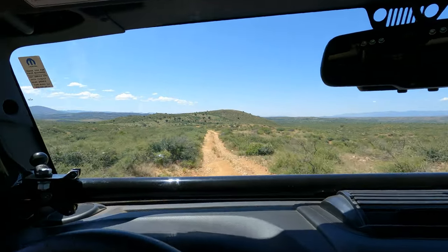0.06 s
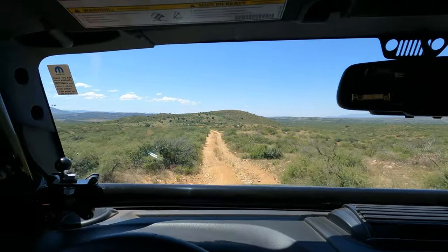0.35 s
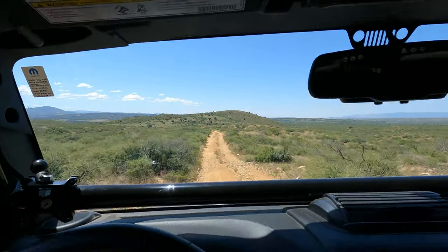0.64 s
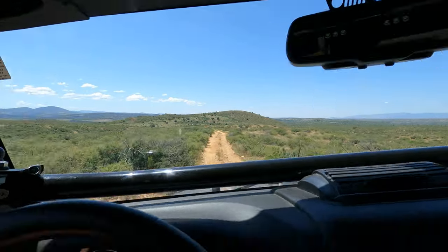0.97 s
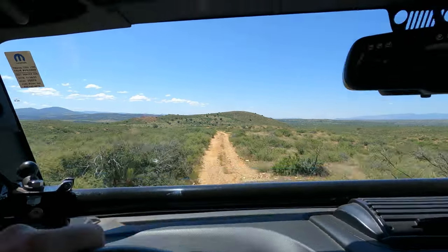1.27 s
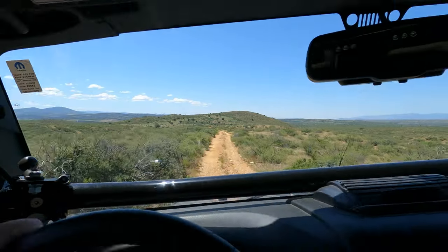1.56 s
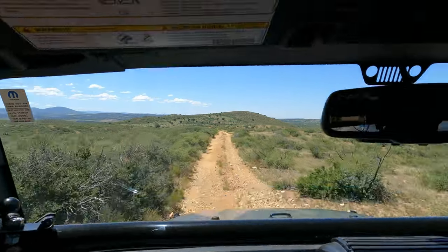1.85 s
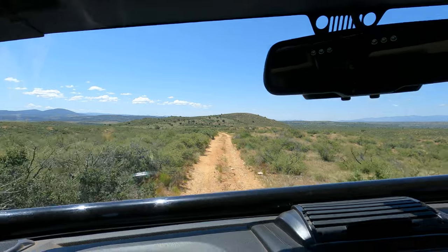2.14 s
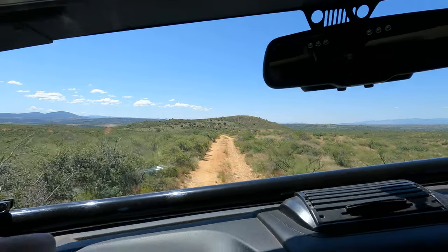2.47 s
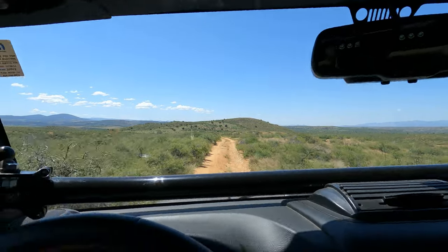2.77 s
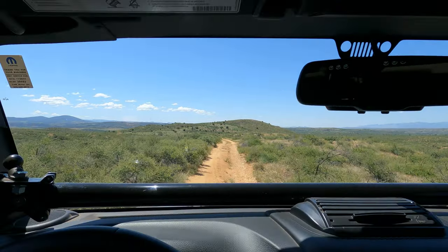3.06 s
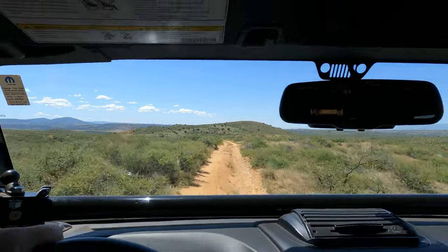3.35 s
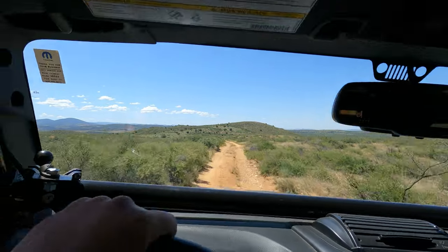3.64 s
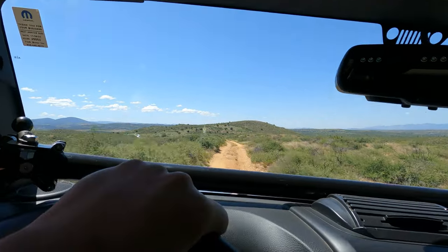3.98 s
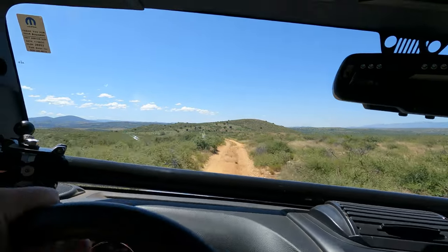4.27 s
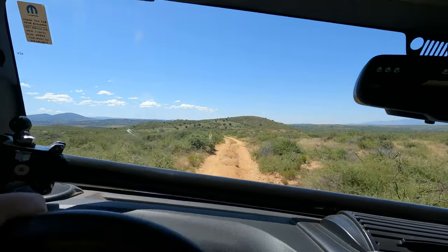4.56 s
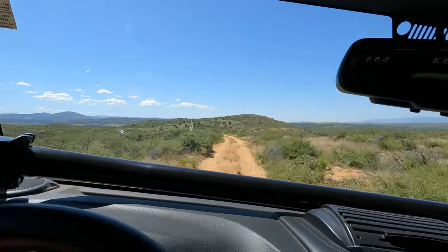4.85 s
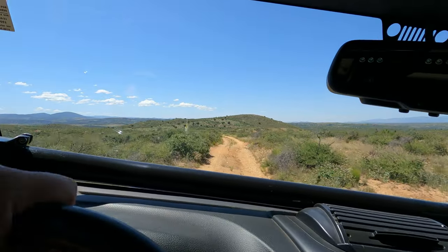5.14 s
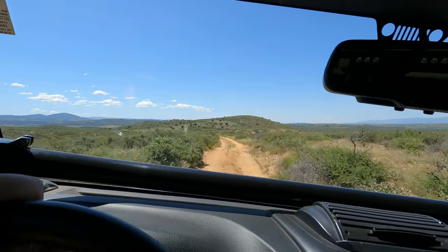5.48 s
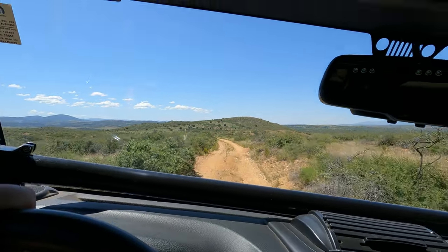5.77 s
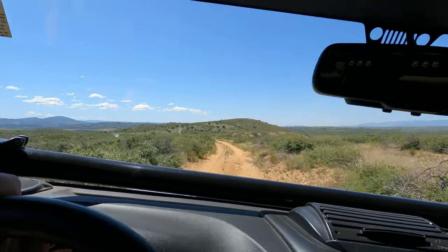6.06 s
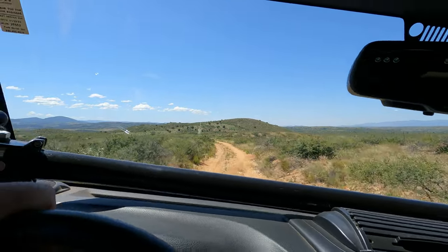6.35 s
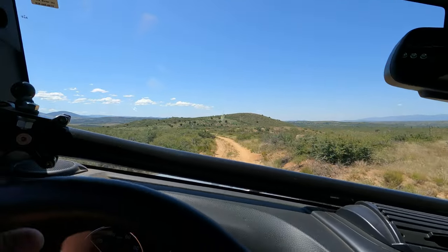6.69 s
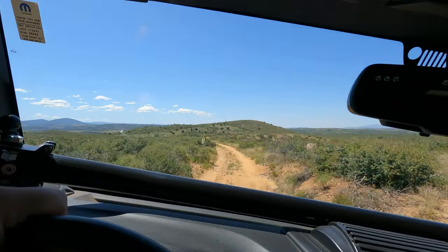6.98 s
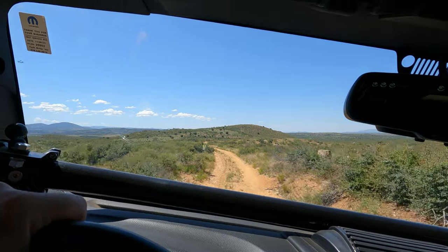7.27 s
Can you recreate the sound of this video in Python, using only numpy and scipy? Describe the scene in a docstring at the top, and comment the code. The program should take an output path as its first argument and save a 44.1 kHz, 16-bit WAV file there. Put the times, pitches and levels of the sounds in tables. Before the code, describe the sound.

Inside a four-wheel-drive vehicle on a rough dirt track: deep rumble, low engine, thumps over ruts, rattling gear and thin squeaks.

```python
"""A deep boom and the roar of tyres fill a four-wheel-drive vehicle on a rough dirt track, over a low
engine. The rough ground forces the body and the cabin air into vibration, and ruts thump through the
suspension. Impacts excite damped modes: the dashboard clunks, loose gear clatters and jangles. Stones
tick underneath, and stick-slip friction draws thin, high squeaks from the trim. After four seconds
the track is smoother and a soft hiss of air shows."""
import sys
import numpy as np
from scipy import signal
from scipy.fft import rfft, irfft
from scipy.io import wavfile
from scipy.ndimage import uniform_filter1d

SR = 44100
rng = np.random.default_rng(int(sys.argv[2]) if len(sys.argv) > 2 else 0)


def transcribe(signal):
    """Save signal, clipped to [-1, 1], as a 16-bit WAV file at the path in sys.argv[1]."""
    frames = np.atleast_2d(signal).T
    limited = np.clip(frames, -1, 1)
    pcm = np.round(limited * 32767).astype(np.int16)
    wavfile.write(sys.argv[1], SR, pcm)


N = 327222
T = np.arange(N) / SR

# Spectra of the noise sources: (frequency [Hz], relative spectral density [dB])
HISS_SPECTRUM = [(300, -4), (1500, 0), (3000, -1), (4500, -2.5), (7000, -3.5), (8500, -7), (11000, -10.5),
                 (15500, -14.5)]
DRUM_SPECTRUM = [(15, 0.5), (30, 5), (46, -2), (58, 3.5), (72, -6), (100, -16), (200, -55)]
CHATTER_SPECTRUM = [(1200, -18), (2400, 7.5), (3300, -3.5), (4400, -3), (5500, -3.5), (7500, -6.5),
                    (9300, -9.5), (11000, -11), (15500, -14)]
CLATTER_SPECTRUM = [(250, 19.5), (700, 17), (1200, 9), (2300, 7.5), (3200, 5.5), (5000, -0.5), (6500, -3),
                    (9300, -5), (11500, -11), (15500, -14)]
THUD_SPECTRUM = [(40, 11.5), (75, -6), (120, 9), (190, 2), (260, 0), (370, -7), (580, -8.5), (900, -18.5),
                 (2500, -27)]
CRUNCH_SPECTRUM = [(250, -2), (500, 4.5), (750, -0.5), (1100, -1), (1700, -5.5), (2400, -12), (3300, -16),
                   (6000, -28.5), (15000, -72)]
ROAR_SPECTRUM = [(50, -9), (80, 1.5), (120, 3), (150, -3), (180, 2), (215, -5), (260, -4), (400, -9.5),
                 (550, -15.5), (900, -19), (2500, -63)]
BOOM_SPECTRUM = [(6, -54), (14, 0), (22, 5), (35, -8), (50, -22.5), (65, -26), (85, -18), (130, -34.5),
                 (300, -98)]
# Envelopes of the hiss, air drumming, shaking, ground roughness and body boom: (time [s], level [dB])
HISS_LEVEL = [(0, -73), (3.1, -72), (4.6, -70), (5.6, -74), (6.25, -75), (6.6, -70.5), (7, -70.5),
              (7.42, -74)]
DRUM_LEVEL = [(.4, -6), (1, 1.5), (6.3, 0.5), (6.6, -2)]
SHAKE_LEVEL = [(0, -62.5), (.3, -68), (.78, -63.5), (1.02, -57.5), (1.3, -62), (1.55, -55.5), (1.8, -59),
               (2.1, -57.5), (2.3, -65), (2.55, -59.5), (2.8, -61.5), (3.25, -63), (3.5, -66), (3.7, -64),
               (4.1, -72.5), (6.2, -71), (7.42, -77)]
TRACK_ROUGHNESS = [(0.0, -53.5), (0.29, -56.5), (0.56, -55.5), (0.99, -47), (1.38, -50), (1.55, -48.5),
                   (2.19, -51.5), (3.2, -51.5), (3.29, -54), (3.8, -52), (4.13, -59), (4.28, -58.5),
                   (5.87, -59.5), (6.18, -56.5), (6.34, -60.5), (6.53, -64), (6.98, -63), (7.42, -62.5)]
BOOM_LEVEL = [(0, -24.5), (.35, -33), (.55, -24), (.75, -31.5), (1.05, -23), (1.3, -31.5), (2.05, -24),
              (2.35, -29.5), (2.7, -24), (2.98, -31), (3.25, -25), (3.7, -30), (4.1, -32.5), (5.25, -37.5),
              (5.55, -31.5), (6.2, -29.5), (6.6, -32.5), (7.42, -40.5)]
# Modes of metal gear, dashboard and body on its mounts: (frequency [Hz], level [dB], t60 [s])
GEAR_MODES = [(1910, 15, 0.082), (2130, -19, 0.14), (2494, 20, 0.04), (4030, 9, .05), (5200, -1, 0.042),
              (6620, 16, 0.02), (6260, -3, 0.028), (6200, 4, .04), (8100, 9, 0.066)]
DASHBOARD_MODES = [(253.4, -11, 0.17), (371, -3, 0.12), (437, -10.5, 0.075), (623, 2.5, 0.042),
                   (752, -8.5, 0.13), (997, 6, .05), (1240, -3, .06)]
BODY_MODES = [(21.6, 0, 0.37), (50, -7.5, 0.3)]
# Running state of the engine: (time [s], crankshaft speed [rev/s], load [dB])
ENGINE_STATE = [(0, 28, -5), (1.5, 27, 1), (3.4, 19, -1), (3.9, 22, 6), (4.15, 22, 11.5), (4.35, 22, 14),
                (4.52, 22.2, -5), (4.66, 21.9, 15.5), (4.87, 21.4, -6), (5.1, 20.6, 9.5), (5.28, 19.3, -2),
                (5.42, 22, 5.5), (5.7, 21, 6.5), (6.45, 18.8, 7), (6.62, 17.3, -11), (6.85, 19, -2),
                (7.42, 18.3, -1)]
# Harmonics of the crankshaft rotation: (order [cycles/rev], level [dB])
ENGINE_ORDERS = [(2, -39), (3, -53.5), (6, -63), (8, -70), (12, -77)]
# Rubs of the trim: (time [s], duration [s], pitch [Hz], level [dB], glide [share], overtones [dB])
RUBS = [(0.33, 0.12, 4660, -70, -0.014, -8), (.492, 0.047, 4620, -66, 0.0029, -5),
        (0.638, 0.053, 4180, -56.5, 0.015, -13), (0.876, .04, 7720, -59, -0.0051, -20),
        (1.185, .035, 7800, -61, 0, -20), (1.642, 0.057, 7730, -55.5, -.01, -20),
        (1.685, 0.065, 4090, -59, -0.02, -11), (1.892, .046, 4570, -51, 0, -10),
        (1.933, .013, 6500, -46, -.6, -25), (1.944, .024, 4280, -47, -.03, -20),
        (1.908, .035, 6900, -57, 0, -20), (2.022, 0.038, 4200, -57, .01, -7),
        (2.504, .07, 2383, -53, 0.047, -12), (2.698, 0.04, 4330, -58, 0, -15),
        (2.745, 0.02, 2820, -49, -.05, -24), (2.88, 0.04, 2330, -53, -.02, -23),
        (2.86, 0.036, 4590, -66.5, 0.014, 3), (3.094, 0.057, 6290, -56, 0, -5),
        (3.192, .04, 6250, -62.5, 0, -15), (4.159, .025, 2610, -63, -.02, -21),
        (4.635, 0.068, 4580, -65.5, 0.015, -5), (4.73, 0.051, 4490, -65, -.015, -6),
        (5.054, 0.03, 2590, -64, -.06, -22), (6.324, 0.122, 4620, -60.5, -0.006, -13),
        (6.587, 0.043, 4190, -71, -.015, -3), (6.868, 0.073, 4670, -66.5, .01, -4),
        (6.93, .11, 4610, -70, -0.0063, -5)]
# Natural notes of the small metal parts: (frequency [Hz])
PART_NOTES = [3900, 4230, 5080, 6020, 6230, 6720, 7200, 7500, 8250, 9050]
# Short, buzzing pings of small metal parts: (time [s], pitch [Hz], level [dB])
PART_STRIKES = [(.615, 12880, -51), (.615, 9250, -56), (.62, 7400, -57), (1.408, 9200, -59),
                (1.008, 13980, -51), (1.04, 12950, -64), (1.24, 8270, -64), (1.408, 12930, -55),
                (1.572, 7100, -53), (1.85, 6180, -37), (1.617, 13980, -54), (1.98, 12120, -53),
                (1.992, 8230, -48), (2.005, 10290, -53), (2.118, 12900, -53), (2.166, 8860, -51),
                (2.52, 9600, -56), (2.705, 7700, -51), (2.87, 12900, -58), (2.695, 15100, -62),
                (2.872, 9250, -58), (2.877, 7460, -58), (2.922, 8600, -60), (2.963, 12940, -60),
                (3.035, 12500, -70)]
# Knocks of loose gear: (time [s], level [dB], duration [s], peak [Hz], metal ring [dB], peak gain [dB])
GEAR_KNOCKS = [(0.44, -51, 0.0061, 1200, -22, 9), (0.451, -55.5, .014, 8500, -26, 15),
               (0.495, -47.5, .009, 4830, -18, -2), (0.712, -55, 0.04, 12000, -22, 6),
               (.783, -47.5, .002, 7360, -21, 8), (0.898, -46, 0.01, 9500, -18, 4),
               (0.932, -47, 0.033, 3040, -24, 3), (1.03, -49, 0.016, 11000, -19, 13),
               (1.087, -50, 0.039, 7500, -19, 9), (1.254, -50.5, 0.011, 6900, -19, 8),
               (1.373, -45, 0.0039, 900, -18, 14), (1.408, -49.5, .02, 9000, -19, 5),
               (1.455, -49.5, 0.016, 8000, -8, 7), (1.481, -36.5, 0.029, 970, -29, 10),
               (1.525, -37.5, .016, 7000, -27, 7.5), (1.536, -41, 0.029, 1500, -24, 14),
               (1.583, -49, 0.017, 8000, -19, 15), (1.683, -45, .002, 900, -18, 22),
               (1.718, -36, 0.0023, 1820, -10, 17), (1.826, -44.5, .015, 8000, -11, 9),
               (1.851, -34, 0.018, 6300, -11, 11.5), (1.865, -37, 0.017, 1910, -14, 11),
               (1.915, -44, 0.012, 1300, -22, 20), (1.938, -45, 0.011, 3500, -25, 11),
               (2.019, -46, 0.025, 885, -7, 6), (2.084, -47.5, 0.02, 9000, -30, 9),
               (2.161, -57, 0.0062, 12000, -16, 10), (2.185, -49.5, 0.0017, 9100, -32, 25),
               (2.209, -48, 0.011, 990, -18, 16), (2.37, -52.5, 0.035, 8100, -20, 9),
               (2.416, -47.5, 0.0054, 4300, -28, 10), (2.526, -50.5, 0.055, 2430, -20, 2),
               (2.551, -44, 0.0057, 2000, -12, 8), (2.598, -51, .006, 2500, -2, 10),
               (2.747, -41.5, 0.0045, 2870, -14, 10), (2.864, -52, 0.032, 7500, -27, 4),
               (3.021, -55, 0.0081, 4000, -19, 8), (3.308, -49.5, 0.015, 1700, -16, 21),
               (3.333, -48.5, 0.021, 5340, -18, 6), (3.472, -45, .006, 636, -20, 11),
               (3.568, -56, .012, 2500, -10, 18), (3.616, -47.5, 0.028, 1170, -22, 16),
               (3.704, -57, 0.0087, 7000, -18, 15), (3.819, -48.5, 0.0066, 2000, -20, 1),
               (3.877, -49, 0.034, 865, -9, 15), (3.944, -62, 0.011, 8000, -16, 12),
               (4.011, -56, .008, 3000, -20, 13), (4.382, -55, 0.0044, 3000, -20, 4),
               (4.432, -57, 0.017, 12000, -26, 10), (4.786, -55.5, 0.012, 6000, -12, -2),
               (5.272, -57.5, .022, 6000, -21, 3), (5.734, -57.5, .01, 8000, -7, 7),
               (6.183, -50, .005, 1802, -22, 9), (6.224, -54, 0.0079, 4000, -27, 6),
               (6.457, -56.5, .007, 4500, -9, 12), (6.747, -50, 0.0017, 2200, -21, 2),
               (7.308, -57, 0.0021, 9000, -18, 7.5)]
# Blows on the hollow dashboard: (time [s], level [dB], centre frequency [Hz])
DASHBOARD_BLOWS = [(.858, -34, 603), (.943, -27, 372), (.972, -31, 350), (1.371, -32, 574),
                   (1.719, -30.5, 650), (1.766, -29.5, 278), (1.868, -31, 470), (1.915, -35, 400),
                   (2.02, -37, 520), (2.1, -34.5, 496), (2.553, -33.5, 660), (2.577, -43, 630),
                   (3.199, -48, 490), (3.32, -41, 556), (3.533, -42, 750)]
# Wheels hitting ruts: (time [s], thud level [dB], decay time [s], panel note [Hz], body swing [dB])
RUTS = [(.554, -34, 0.091, 118, -24), (.62, -44, 0.073, 225, -25), (0.849, -28.5, 0.049, 265, -28),
        (.943, -27, 0.015, 368, -41), (0.974, -23.5, 0.02, 392, -14.5), (1.033, -26, 0.012, 136, -25),
        (1.371, -30.5, 0.043, 194, -13), (1.426, -33.5, 0.024, 258, -43), (1.493, -24, 0.035, 197, -8),
        (1.534, -29, 0.028, 320, -13), (1.865, -36.5, 0.23, 268.6, -50), (2.031, -35, 0.089, 240, -16.5),
        (2.123, -30, 0.016, 174, -42), (2.384, -27, 0.02, 237, -51), (2.56, -36, 0.041, 314, -14),
        (2.68, -30.5, 0.057, 220, -24), (2.879, -37, 0.046, 116, -28), (3.034, -36, 0.074, 192, -57),
        (3.185, -27.5, 0.072, 202, -16), (3.301, -26.5, 0.043, 185, -18), (3.815, -36, 0.038, 138, -22.5),
        (5.969, -32.5, 0.029, 285, -42), (6.17, -43, 0.048, 109, -53), (6.218, -44.5, 0.21, 294, -53),
        (6.421, -40, 0.12, 162.4, -53), (6.93, -44, 0.15, 250, -47), (7.33, -49.5, 0.076, 170, -34)]


def amp(db):
    """Amplitude ratio of a level in decibels."""
    return 10 ** (np.asarray(db) / 20)


def unit(x):
    """Normalisation to rms 1."""
    return x / np.sqrt(np.mean(x ** 2) + 1e-20)


def envelope(table):
    """Linear interpolation of a (time, level) table at every sample."""
    return np.interp(T, *np.transpose(table))


def add(mix, start_s, sound):
    """Superposition of a sound on the mix, in place."""
    part = mix[max(round(start_s * SR), 0):][:len(sound)]
    part += sound[:len(part)]


def colour(x, spectrum, peak_hz=1000, peak_db=0, octaves=1):
    """Filtering by a spectrum plus one resonance, whose half-width is in octaves; rms 1."""
    octave = np.log2(np.fft.rfftfreq(len(x), 1 / SR) + 1)
    hz, db = np.transpose(spectrum)
    rolloff_db = 20 * np.maximum(octave - np.log2(hz[-1]), 0)
    resonance_db = peak_db / (1 + ((octave - np.log2(peak_hz)) / octaves) ** 2)
    gain = amp(np.interp(octave, np.log2(hz), db) + resonance_db - rolloff_db)
    return unit(irfft(rfft(x) * gain, len(x)))


def wander(rate_hz, size=N):
    """Random fluctuation: noise low-passed at about the given rate; rms 1."""
    hz = np.fft.rfftfreq(size, 1 / SR)
    return unit(irfft(rfft(rng.standard_normal(size)) * np.exp(-(hz / rate_hz) ** 2), size))


def steadied(x, span_s):
    """Division by the running rms evens out swells longer than the span."""
    return x / np.sqrt(np.abs(uniform_filter1d(x ** 2, int(span_s * SR))) + 1e-9)


def impacts(per_s, spread_db, size=N):
    """A Poisson train of impulses; a positive spread makes a few stronger, a negative one weaker."""
    height = amp(spread_db * np.minimum(rng.exponential(1, size), 4)) * rng.choice([-1, 1], size)
    return height * (rng.random(size) < per_s / SR)


def grit(per_s, spread_db, decay_s):
    """Incoherent impacts add in power, each an exponentially decaying puff of noise."""
    power = signal.lfilter([1], [1, -np.exp(-2 / (decay_s * SR))], impacts(per_s, spread_db) ** 2)
    return np.sqrt(power) * rng.standard_normal(N)


def ring(modes, t):
    """Free decay of damped modes."""
    return sum(amp(db - 60 * t / t60) * np.sin(2 * np.pi * hz * t) for hz, db, t60 in modes)


def cabin(x, wet_db, t60):
    """Reverberation: dense, short reflections off the glass and the hard roof."""
    t = T[:SR // 4]
    tail = rng.standard_normal(len(t)) * amp(-60 * t / t60) * (t > .002)
    wet = signal.oaconvolve(x, tail / np.linalg.norm(tail))[:N]
    return (x + amp(wet_db) * wet) / np.hypot(1, amp(wet_db))


def roughness():
    """Excitation by the track, in dB about its mean; a source's slope is its dB per dB of this."""
    db = envelope(TRACK_ROUGHNESS)
    return db - db.mean()


def air_hiss():
    """Broadband noise of air hisses softly in the cabin."""
    return amp(envelope(HISS_LEVEL)) * colour(rng.standard_normal(N), HISS_SPECTRUM)


def engine(level_db=-2, wobble=0.0082, throb_db=3.5):
    """Periodic forcing gives low harmonics of the crankshaft speed, which swell with the load."""
    times, speed, load_db = np.transpose(ENGINE_STATE)
    turns = np.cumsum(np.interp(T, times, speed) * (1 + wobble * wander(4.3))) / SR
    drone = sum(amp(db + throb_db * wander(7.8)) * np.sin(2 * np.pi * order * turns)
                for order, db in ENGINE_ORDERS)
    return amp(level_db + np.interp(T, times, load_db)) * drone


def cabin_drumming(level_db=-39.0, slope=0.05):
    """Cavity resonance: the enclosed air drums, a little harder on rough ground."""
    drumming = steadied(colour(rng.standard_normal(N), DRUM_SPECTRUM), span_s=0.52)
    return amp(level_db + envelope(DRUM_LEVEL) + slope * roughness()) * drumming


def stone_ticks(level_db=-73, slope=0.77):
    """Brief impacts have broad spectra: stones flick off the tread and tick on the underside."""
    hits = grit(per_s=30, spread_db=2.5, decay_s=0.003)
    ticks = colour(hits, CLATTER_SPECTRUM, peak_hz=9000, peak_db=5)
    return cabin(amp(level_db + slope * roughness()) * ticks, wet_db=-12.0, t60=0.036)


def trim_squeaks(gain_db=0.5, dull_hz=9500, dull_db_per_octave=-24):
    """Stick-slip friction: a thin tone whose pitch and level arch with the speed of the rub."""
    arch, waver, catch_db = .022, .003, 2.3
    rasp_radians, rasp_hz, firm_db, radians_per_light_db = .38, 4600, -62, .08
    out = np.zeros(N)
    for start, length, hz, db, glide, overtone_db in RUBS:
        along = np.linspace(-.5, .5, int(length * SR))
        speed = np.cos(np.pi * along).clip(0)
        jitter, grip, slips = (wander(rate_hz, SR // 2)[:len(speed)] for rate_hz in (60, 70, 240))
        pitch = hz * (1 + arch * (speed - speed.mean()) + glide * along + waver * jitter)
        # Low creaks and light rubs rasp most.
        rasp = rasp_radians * max(rasp_hz / hz, 1) ** 2 + radians_per_light_db * max(firm_db - db, 0)
        phase = 2 * np.pi * np.cumsum(pitch) / SR + rasp * slips
        tone = np.sin(phase)
        for k in (2, 3):
            if k * pitch.max() < SR / 2:
                dulling_db = dull_db_per_octave * max(np.log2(k * hz / dull_hz), 0)
                tone += amp(overtone_db + dulling_db) * np.sin(k * phase)
        add(out, start, amp(db + gain_db + catch_db * (grip - grip.mean())) * np.sqrt(speed) * tone)
    return cabin(out, wet_db=-5.5, t60=0.077)


def touching_parts(pitches, per_s, spread_db, t60):
    """Impulse response: each small metal part rings at its own pitch whenever it is touched."""
    notes = (ring([(hz, 0, t60)], T[:SR // 8]) for hz in pitches)
    return sum(signal.oaconvolve(impacts(per_s, spread_db), note)[:N] for note in notes)


def jolts(settle_s):
    """Exponential relaxation of the shaking that each rut starts; 1 at its strongest."""
    kicks = np.zeros(N)
    for start, db, *_ in RUTS:
        add(kicks, start, amp([db]))
    shaking = signal.lfilter([1], [1, -np.exp(-1 / (settle_s * SR))], kicks)
    return shaking / shaking.max()


def rattle(ticks_db=-3, chinks_db=-9, jangle_db=-10, slack_db=-70, jolt_db=5, fitful_db=1.5):
    """Contact across a clearance: loose parts tick, chink and jangle as shaking takes up their slack."""
    shake = amp(envelope(SHAKE_LEVEL) + jolt_db * jolts(settle_s=0.074) + fitful_db * wander(27))
    contact = shake ** 2 / np.hypot(shake, amp(slack_db))
    ticks = colour(grit(per_s=140, spread_db=-4.0, decay_s=0.012), CHATTER_SPECTRUM)
    chink_hz = np.geomspace(3500, 13500, 36) * rng.uniform(1.0, 1.03, 36)
    chinks = colour(touching_parts(chink_hz, per_s=6, spread_db=2.0, t60=0.04), CHATTER_SPECTRUM)
    jangle_hz = np.outer(PART_NOTES, [.985, 1, 1.015]).ravel()  # a note varies with how the part lies
    jangle = unit(touching_parts(jangle_hz, per_s=14, spread_db=3.0, t60=0.066))
    return contact * (amp(ticks_db) * ticks + amp(chinks_db) * chinks + amp(jangle_db) * jangle)


def metal_pings(rise_s=0.004, t60=0.1, beat_hz=70, twin_db=-6, chatter_db=3, buzz_radians=.8):
    """Two close modes beat in each struck part, modulated as it buzzes against its seat."""
    out, t = np.zeros(N), T[:SR // 4]
    for start, hz, db in PART_STRIKES:
        phase = 2 * np.pi * hz * t + buzz_radians * wander(400, len(t))
        pair = np.sin(phase) + amp(twin_db) * np.sin(phase + 2 * np.pi * beat_hz * t)
        ping = pair * amp(-60 * t / t60) * (1 - np.exp(-t / rise_s))
        chatter = unit(amp(chatter_db * wander(450, len(t))))
        add(out, start, amp(db) * chatter * ping)
    return cabin(out, wet_db=-9, t60=0.068)


def gear_knocks(rise_s=0.0007, rise_share=0.12, fall_s=0.0037, fall_share=0.13):
    """Bursts of quick contacts excite the gear's metal modes; longer bursts build and die more slowly."""
    out, t = np.zeros(N), T[:SR // 4]
    metal = ring(GEAR_MODES, t)
    for start, db, length, hz, ring_db, peak_db in GEAR_KNOCKS:
        hits = impacts(per_s=5000, spread_db=1.7, size=len(t))
        contacts = steadied(colour(hits, CLATTER_SPECTRUM, hz, peak_db, octaves=0.68), span_s=0.0035)
        rise = 1 - np.exp(-t / (rise_s + rise_share * length))
        fall = np.exp(-np.maximum(t - length, 0) / (fall_s + fall_share * length))
        burst = contacts * rise * fall
        ringing = unit(signal.fftconvolve(burst, metal)[:len(t)]) * np.std(burst)
        add(out, start, amp(db) * (burst + amp(ring_db) * ringing))
    return cabin(out, wet_db=-8.0, t60=0.21)


def dashboard_clunks(rise_s=0.0037, falloff_db_per_octave=16, detune=0.017, judder_db=2):
    """Modal excitation: each blow favours the panel modes near its own centre frequency."""
    out, t = np.zeros(N), T[:SR // 4]
    for start, db, centre_hz in DASHBOARD_BLOWS:
        modes = [(hz * (1 + detune * rng.standard_normal()),
                  mode_db - falloff_db_per_octave * abs(np.log2(hz / centre_hz)), t60)
                 for hz, mode_db, t60 in DASHBOARD_MODES]
        judder = amp(judder_db * wander(120, len(t)))
        clunk = ring(modes, t) * (1 - np.exp(-t / rise_s)) * judder
        add(out, start, amp(db) * clunk / abs(clunk).max())
    return cabin(out, wet_db=-5.5, t60=0.15)


def rut_thumps(rise_s=0.0037, hollow_db=11, note_db=-13):
    """Transient response: each rut thuds through a resonant panel and sets the body swinging."""
    out, t = np.zeros(N), T[:SR // 2]
    for start, db, decay_s, hz, swing_db in RUTS:
        panel = colour(rng.standard_normal(len(t)), THUD_SPECTRUM, hz, hollow_db, octaves=0.51)
        note = amp(note_db) * np.sin(2 * np.pi * hz * t)
        thud = amp(db) * (steadied(panel, span_s=0.0182) + note) * np.exp(-t / decay_s)
        swing = amp(swing_db) * ring(BODY_MODES, t)
        add(out, start, (thud + swing) * (1 - np.exp(-t / rise_s)))
    return out


def rolling(roar_db=-45.5, crunch_db=-55.5, roar_slope=0.82, lumps_db=1.23, uneven_db=1.12):
    """Random forcing by the ground: the sprung body booms, the wheel arches roar, the tread crunches."""
    rough_db = roughness() + uneven_db * wander(9.6)
    lumps = amp(lumps_db * wander(25))  # stones lift roar and crunch together
    boom = steadied(colour(rng.standard_normal(N), BOOM_SPECTRUM), span_s=0.07)
    roar = steadied(colour(rng.standard_normal(N), ROAR_SPECTRUM), span_s=0.086)
    crunch = colour(grit(per_s=2500, spread_db=-3.5, decay_s=0.0096), CRUNCH_SPECTRUM)
    tyres = amp(roar_db + roar_slope * rough_db) * roar + amp(crunch_db + rough_db) * crunch
    return amp(envelope(BOOM_LEVEL)) * boom + lumps * tyres


def scene():
    """Superposition of all sources at the driver's seat, in one channel."""
    continuous = engine() + rolling() + cabin_drumming() + rattle() + air_hiss()
    blows = rut_thumps() + dashboard_clunks() + gear_knocks()
    return (continuous + blows + trim_squeaks() + metal_pings() + stone_ticks())[None]


def record(dry, cutoff_hz=15720):
    """Band limiting: a steep low-pass filter removes the highest treble."""
    lowpass = signal.firwin(1023, cutoff_hz, window=("kaiser", 9), fs=SR)
    return signal.oaconvolve(dry, lowpass[None], "same")


dry = scene()
out = record(dry)
transcribe(out)
```